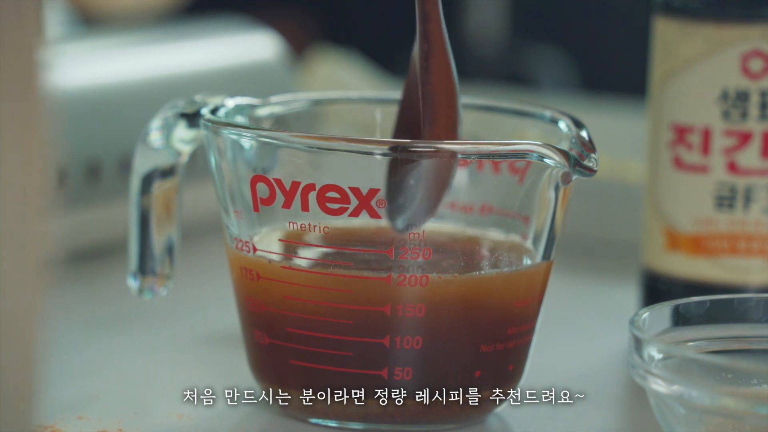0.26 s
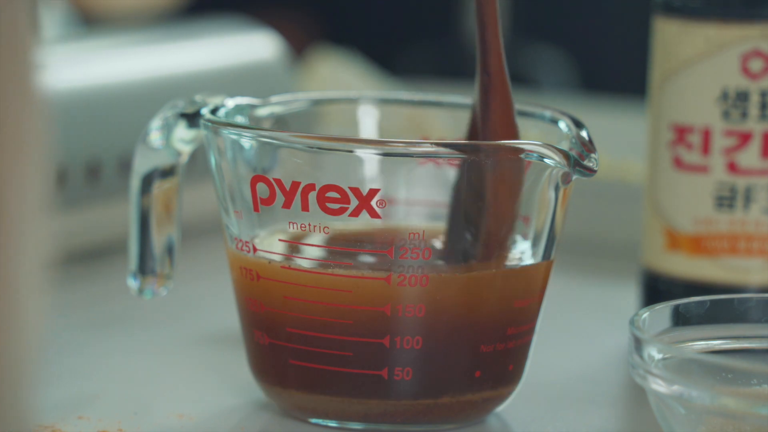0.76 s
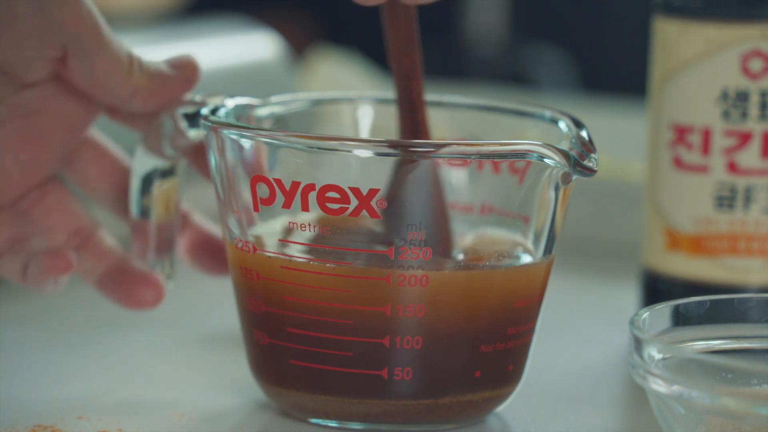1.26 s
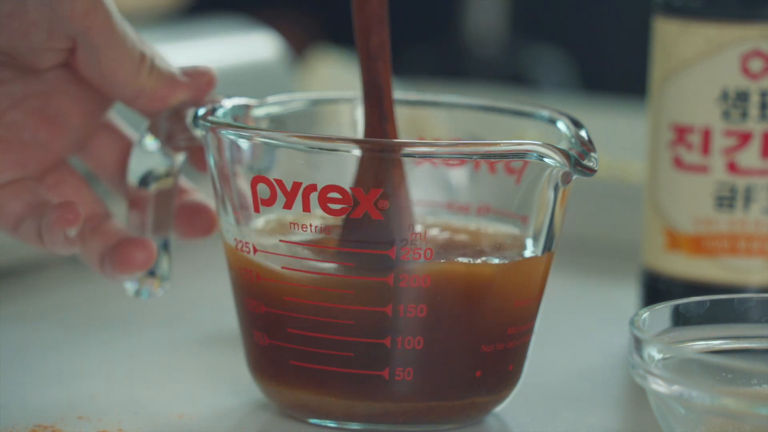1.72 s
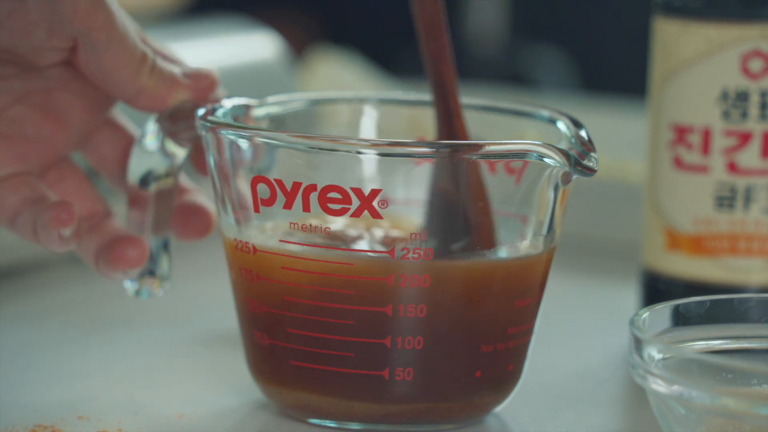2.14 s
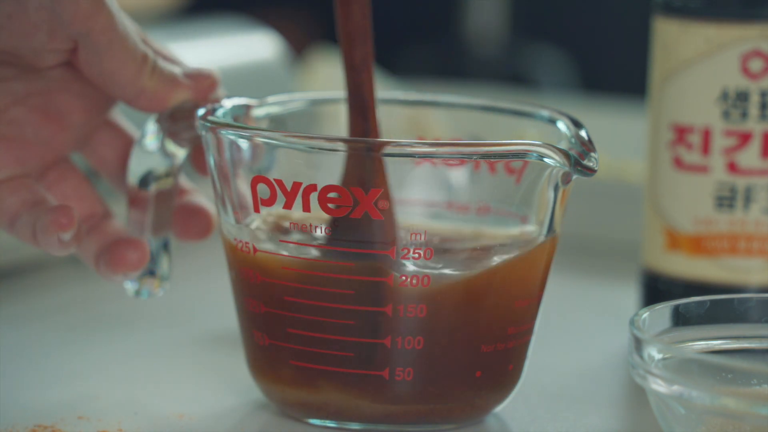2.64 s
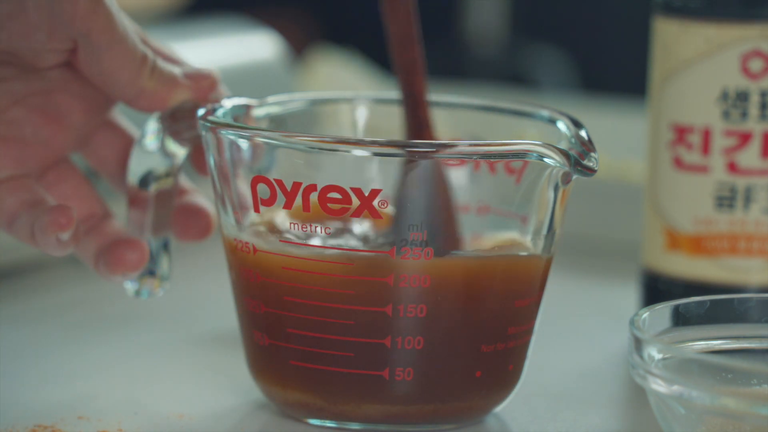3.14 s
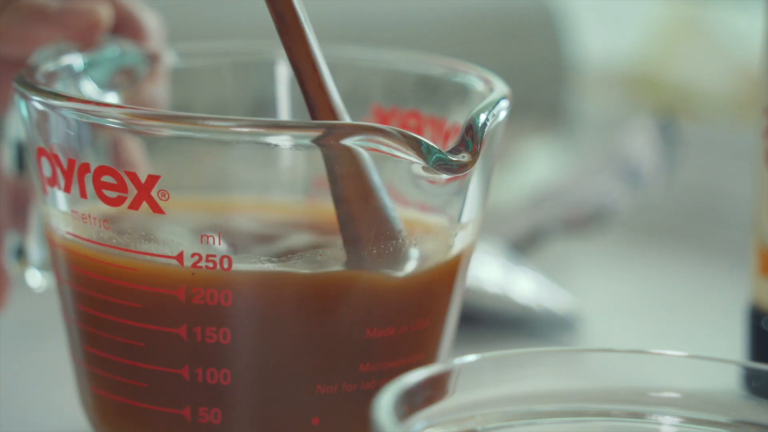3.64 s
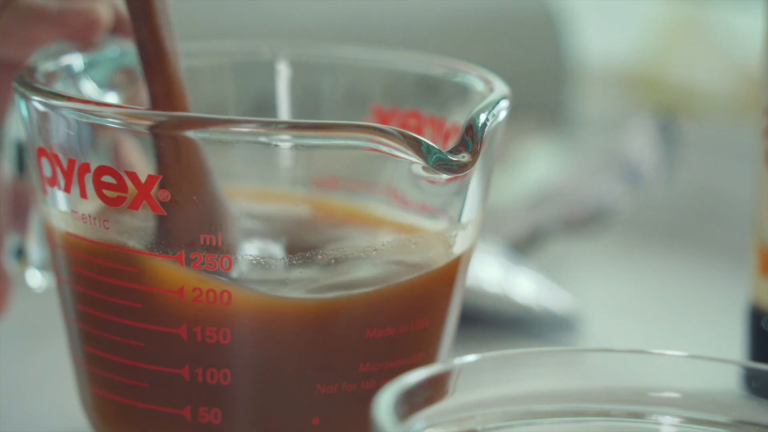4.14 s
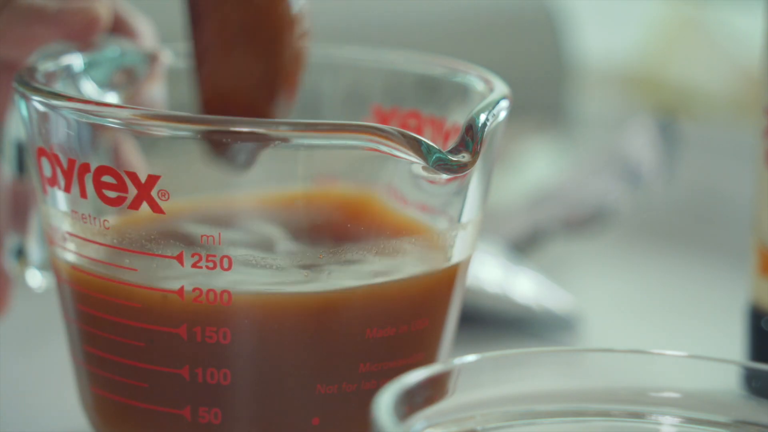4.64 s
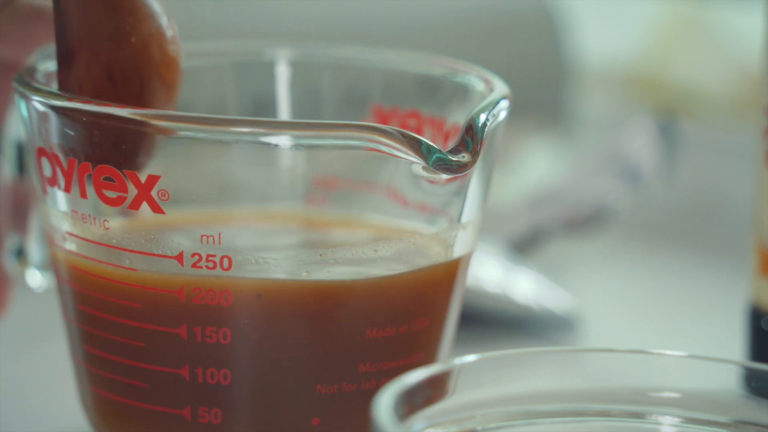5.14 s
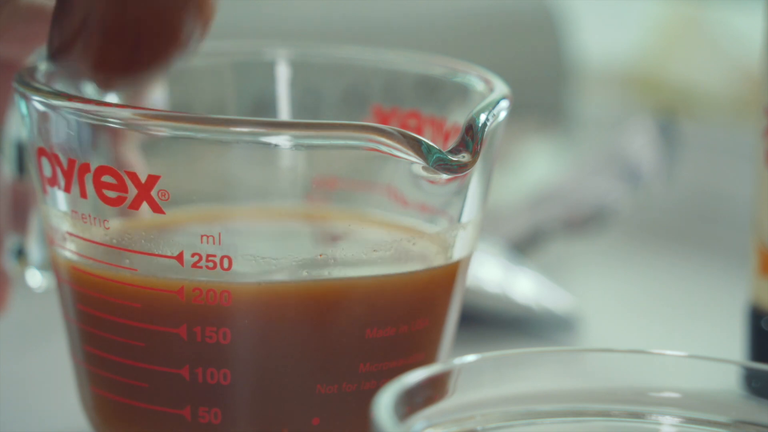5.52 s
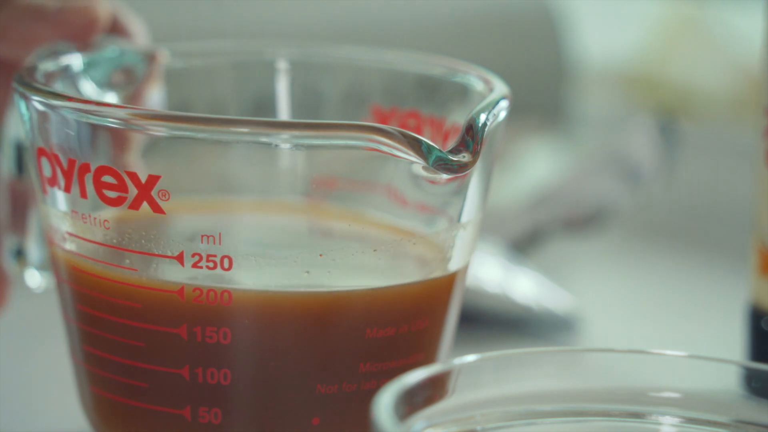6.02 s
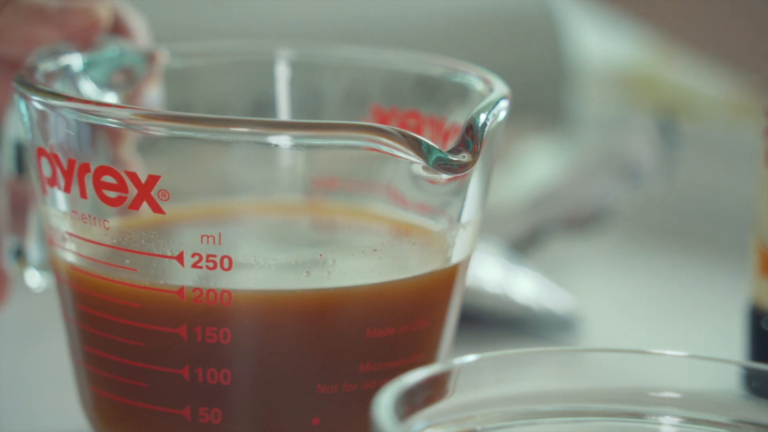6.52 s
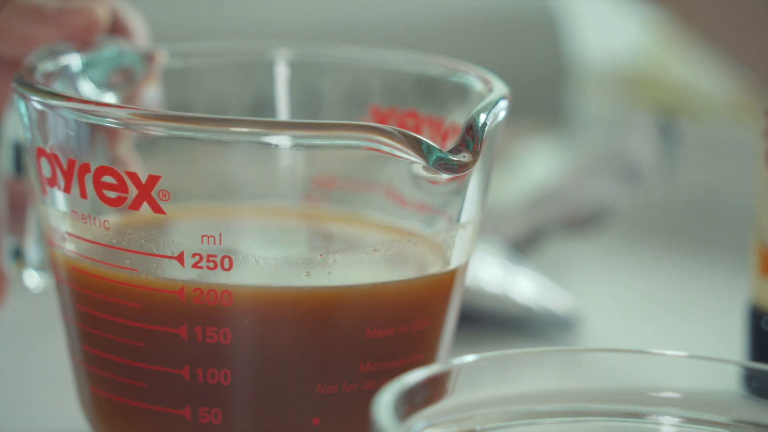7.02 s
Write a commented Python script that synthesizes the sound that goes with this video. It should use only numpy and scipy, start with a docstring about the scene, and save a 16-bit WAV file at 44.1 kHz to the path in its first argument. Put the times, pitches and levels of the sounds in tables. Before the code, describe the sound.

Quiet kitchen stirring: dull wooden nudges on a filled glass cup, faint wet ticks, two rim taps, then a knock and loud dish clatter.

```python
"""A wooden spoon stirs thin sauce in a thick glass measuring cup, nearest the microphone on a kitchen counter.
Each nudge and the last tap at the rim ring the glass modes; small ticks and lapping crackles are shaped noise.
At the start the counter is bumped: damped modes and a thud, a bright click, then a short brushing hiss.
At the end the spoon goes on a dish: a dull knock, sliding noise, a sharp clatter as the handle drops.
Still kitchen air lies behind as coloured noise; a small hard room answers with a decaying noise tail."""
import sys
import numpy as np
from scipy import signal
from scipy.fft import rfft, irfft
from scipy.io import wavfile

SR = 44100
rng = np.random.default_rng(int(sys.argv[2]) if len(sys.argv) > 2 else 0)


def wav_out(sig):
    """Save sig, one row per channel (or a flat mono array), as 16-bit PCM at SR to the path in sys.argv[1]."""
    wavfile.write(sys.argv[1], SR, np.round(np.clip(np.atleast_2d(sig).T, -1, 1) * 32767).astype(np.int16))


N = 320166
TIME = np.arange(N) / SR
RING = SR // 2  # samples in one struck sound and in the room tail: half a second
TOP_HZ = 15750  # upper limit of the microphone signal

# Still kitchen air, spectral shape: (f/Hz, relative level/dB per Hz)
AIR = [(12, -29), (20, 2), (53, -4), (83, -5), (140, -10), (180, -10), (282, -16.5), (352, -15),
       (416, -19.5), (649, -18.5), (1040, -23), (2150, -31.5), (15500, -41)]
AIR_DB = -60.5  # rms level
# Decay of the room: (f/Hz, t60/s)
ROOM_T60 = [(100, 0.83), (300, 0.51), (900, 0.53), (2500, 0.4), (6000, 0.5), (10000, 0.37), (15000, 0.45)]

# Bumps on the counter, the last two under the dish: (t/s, level/dB, contact brightness f/Hz)
BUMPS = [(.1222, -31, 9000), (.309, -53, 900), (0.3686, -54, 1400), (6.424, -53, 170), (7.019, -49, 170)]
# Ringing modes of the counter: (f/Hz, t60/s, relative level/dB)
COUNTER_MODES = [(47.6, 0.49, -29), (89.3, 0.11, -7.5), (103.2, 0.82, -20.5), (122.8, 0.25, -14.5),
                 (159, 0.077, -10.5), (252, 0.12, -13), (343.3, 0.28, -18.5), (436.6, 0.27, -21),
                 (517, 0.083, -9), (583, 0.046, -6.5), (863, 0.028, -2), (939, 0.043, -4.5),
                 (1474, 0.053, -19.5)]
# Colour of the counter's thud: (f/Hz, relative level/dB)
COUNTER_THUD = [(60, -6), (250, 2.5), (600, 1), (1000, 2.5), (1500, -15), (3000, -12.5), (6000, -27),
                (11000, -22), (15000, -41)]

# Colour of the short brushing hiss: (f/Hz, relative level/dB)
BRUSH_COLOUR = [(800, 1), (2500, -3), (5000, -2), (7500, 0), (10000, -5.5), (15000, -8)]
BRUSH_AT_S, BRUSH_DB = 0.366, -63.5  # start of the hold, level
BRUSH_RISE_S, BRUSH_HOLD_S, BRUSH_FALL_S = 0.16, 0.045, 0.24  # slopes span 60 dB
# Slips of the spoon on the dish: (t/s at the peak, level/dB, release through 60 dB/s)
SLIPS = [(6.46, -61, 0.74), (6.78, -74.5, .2), (6.915, -68, .3)]
SLIP_RISE_S = 0.39  # attack of every slip, through 60 dB
# Colour of the sliding noise: (f/Hz, relative level/dB)
SLIDE_COLOUR = [(600, -9), (1300, -7), (1900, -16), (2600, 1), (3500, -7), (4300, -16), (6700, -9.5),
                (14000, -21.5)]

# Spoon on the dish: (t/s, level/dB, contact brightness f/Hz, place 0 = well .. 1 = rim)
DISH_HITS = [(6.423, -24, 3040, 0.11), (6.873, -63, 3600, 0.67), (6.914, -64, 3200, 0.95),
             (7.0002, -28.5, 2320, 0.89), (7.0036, -11.5, 15300, 1), (7.0227, -24, 3830, 0.64),
             (7.0411, -27, 2560, 1), (7.0542, -33.5, 4570, 0.34), (7.063, -39, 9000, 1)]
# Ringing modes of the dish: (f/Hz, t60/s, relative level/dB struck in the well, the same at the rim)
DISH_MODES = [(902, 0.056, -24.5, -22.5), (1171, 0.11, -20, -12.5), (1266, 0.04, -5, -24),
              (1308.3, 0.18, -10.5, -15.5), (1333, 0.063, -2.5, -16), (1510, 0.054, -15, -21),
              (1760, 0.021, -19, -28), (2050, 0.074, -8.5, -39), (2098, 0.029, 3, -25),
              (2308, 0.02, -11.5, 2), (2483, 0.013, -28, 6.5), (2580, .35, -41, -39),
              (2710, 0.015, -8, -21), (3140, 0.034, -8.5, -6), (3300, 0.029, -6, 1.5),
              (3492, 0.025, -9.5, 2), (3750, 0.025, -33, -15), (4500, 0.027, -12.5, -10),
              (4930, 0.22, -31, -21), (5250, 0.018, -28, 4.5), (6040, 0.021, -41, -18),
              (6430, 0.033, -35, -8), (6600, 0.39, -26, -20.5), (6620, .022, -30, 0),
              (7650, 0.015, -39, -13), (7800, 0.01, -36, 0.5), (8450, 0.013, -32, 5),
              (9300, 0.018, -38, -18), (10120, 0.02, -34, -7), (11900, 0.022, -40, -35)]
# Colour of the crack of wood on the dish: (f/Hz, relative level/dB)
DISH_CRACK = [(100, -30), (280, -2.5), (500, -5), (800, -4), (1600, 3.5), (2600, 9), (3500, 8.5),
              (4200, -4.5), (6500, 4), (9500, 0), (15000, -15.5)]

# Small ticks: the first is the bright click of a small knock on the counter, the others come
# from the wet spoon: (t/s, level/dB, tilt/dB per octave, ring of the glass over the tick/dB)
TICKS = [(0.3678, -60, -1, -9), (1.2207, -71, 5, -20), (1.3304, -73, 11, -20), (2.2741, -55.5, -0.5, -10),
         (2.8501, -64, -2, -13), (2.927, -67, -4, -7), (3.089, -65.5, -1.5, -6), (3.1163, -67, 0.5, -15),
         (3.1641, -59.5, 2.5, -22), (3.418, -73, 3, -1), (3.7077, -67.5, 7, -1)]
# Strokes that push a wave of sauce round the spoon: (t/s at the crest, level/dB)
LAPS = [(1.45, -73), (2.25, -82), (2.76, -69.5), (2.92, -67.5), (3.17, -63), (3.44, -77)]
LAP_RISE_S, LAP_FALL_S = 0.46, 0.33  # every wave gathers and settles alike, through 60 dB
# Colour of the hollow of the cup, shared by the ticks and the laps: (f/Hz, relative level/dB)
HOLLOW = [(300, 4), (1000, 3.5), (1700, 5.5), (2200, 0), (2600, 11.5), (3200, -41), (3800, 0), (4300, -1.5),
          (5000, -17), (6500, -2.5), (8000, 1), (9600, -7.5), (11000, -24), (14000, -14)]

# Spoon on the cup: (t/s, level/dB, contact brightness f/Hz,
# place 0 = wall under the sauce .. 1 = rim, thud relative level/dB)
CUP_HITS = [(1.177, -54.5, 2060, 0.18, 10), (1.693, -49, 2680, 0.16, -2.5), (2.135, -52, 1890, 0.16, 4.5),
            (2.181, -55, 2200, 0.26, 6), (2.668, -57.5, 1750, 0.31, 2), (3.040, -56.5, 1600, 0.04, 9.5),
            (3.585, -56, 2960, 0.35, 1), (4.933, -45.5, 2200, 0.55, 1.5), (5.382, -41, 12600, 0.77, -1.5)]
# Ringing modes of the filled cup: (f/Hz, t60/s, relative level/dB struck on the wall, the same at the rim)
CUP_MODES = [(213, 0.088, -24, -13), (567, 0.1, -12, -14), (940, 0.019, -9, -29), (1250, 0.069, -10, -9),
             (1473, 0.19, -0.5, 1), (2130, 0.07, 6, -39), (2520, 0.039, -5, -31), (3290, 0.019, -20, 2),
             (3660, 0.071, -17, -2), (4270, 0.076, -18, -7), (7510, .05, -30, -28)]
# Colour of the wood and liquid under each contact: (f/Hz, relative level/dB)
CUP_THUD = [(90, -13), (200, 3.5), (550, -2), (1050, 2.5), (1900, -16.5), (2500, -4.5), (3100, -11.5),
            (5500, -18), (9000, -13), (11000, -21), (14000, -10)]


def undb(db):
    """Decibels to gain."""
    return 10 ** (np.asarray(db) / 20)


def on_log_axis(hz, points):
    """Read (f/Hz, value) points on a log-frequency axis."""
    f, value = np.transpose(sorted(map(tuple, points)))
    return np.interp(np.log(np.maximum(hz, 1)), np.log(f), value)


def noise(colour, size):
    """Noise of rms 1, its spectrum shaped by (f/Hz, level/dB) points."""
    spectrum = rfft(rng.standard_normal(size))
    gain = undb(on_log_axis(np.fft.rfftfreq(size, 1 / SR), colour))
    shaped = irfft(spectrum * gain, size)
    return shaped / shaped.std()


def swell(s, db, rise_s, fall_s, hold_s=0):
    """Gain over time: an attack that peaks at s, a hold and a release; both slopes span 60 dB."""
    early = np.maximum(s - TIME, 0)
    late = np.maximum(TIME - s - hold_s, 0)
    return undb(db) * np.exp(-np.log(1000) * (early / rise_s + late / fall_s))


def fade(t60):
    """An exponential decay through 60 dB in t60 seconds."""
    return np.exp(-np.log(1000) * TIME[:RING] / t60)


def add(track, s, sound, db):
    """Lay a sound into a track; db is its rms over the first hundredth of a second."""
    start = int(s * SR)
    part = sound[:N - start] * undb(db) / sound[:SR // 100].std()
    track[start:start + len(part)] += part


def struck_at(modes, place):
    """The place of a blow, 0 to 1, decides how strongly each mode speaks."""
    hz, t60, inner_db, rim_db = np.transpose(modes)
    return zip(hz, t60, inner_db + place * (rim_db - inner_db))


def strike(modes, colour, crack_db, crack_t60, bright_hz, lowest_hz, grit_db=-34, order=3):
    """One blow: ringing modes and a short crack; a softer contact pushes longer and loses the treble."""
    ring = np.zeros(RING)
    for k, (hz, t60, db) in enumerate(modes):
        sign = (-1) ** k  # neighbouring modes start in opposite directions
        ring += sign * undb(db) * fade(t60) * np.sin(2 * np.pi * hz * TIME[:RING])
    body = ring + undb(crack_db) * fade(crack_t60) * noise(colour, RING)
    contact = signal.butter(order, bright_hz, fs=SR, output="sos")
    # the grain of the wood lets a little treble through even a soft contact
    blow = signal.sosfilt(contact, body) + undb(grit_db) * body
    # a small object radiates no deep bass
    return signal.sosfilt(signal.butter(2, lowest_hz, "high", fs=SR, output="sos"), blow)


def kitchen_air():
    """Steady noise with the spectrum of the still kitchen: low rumble and faint hiss."""
    return noise(AIR, N) * undb(AIR_DB)


def room(x, wet_db, build_s, count=10):
    """Reflections as a noise tail that builds up quickly and dies band by band."""
    hz = np.fft.rfftfreq(RING, 1 / SR)
    centres = np.geomspace(100, TOP_HZ, count)
    white = rfft(rng.standard_normal(RING))
    tail = np.zeros(RING)
    for centre, share in zip(centres, np.eye(count)):
        # each band overlaps its neighbours, and together they add up to 1
        band = irfft(white * on_log_axis(hz, zip(centres, share)), RING)
        tail += band * fade(on_log_axis(centre, ROOM_T60))
    tail *= 1 - np.exp(-(TIME[:RING] / build_s) ** 2)
    return undb(wet_db) * signal.fftconvolve(x, tail / np.linalg.norm(tail))[:N]


def counter():
    """The worktop's modes boom when it is bumped, and faintly under the dish."""
    out = np.zeros(N)
    for s, db, bright_hz in BUMPS:
        blow = strike(COUNTER_MODES, COUNTER_THUD, crack_db=-4, crack_t60=0.025,
                      bright_hz=bright_hz, lowest_hz=39.3, grit_db=-42)
        add(out, s, blow, db)
    return out


def rubbing():
    """Friction as swelling noise: a brief brush after the bump, and the wet spoon sliding on the dish."""
    brush = swell(BRUSH_AT_S, BRUSH_DB, BRUSH_RISE_S, BRUSH_FALL_S, BRUSH_HOLD_S)
    slips = sum(swell(s, db, SLIP_RISE_S, fall_s) for s, db, fall_s in SLIPS)
    return noise(BRUSH_COLOUR, N) * brush + noise(SLIDE_COLOUR, N) * slips


def dish(well_crack_db=0, rim_crack_db=5):
    """The spoon's bowl lands in the well; its handle drops on the rim with a harder crack and bounces."""
    out = np.zeros(N)
    for s, db, bright_hz, place in DISH_HITS:
        crack_db = well_crack_db + place * (rim_crack_db - well_crack_db)
        blow = strike(struck_at(DISH_MODES, place), DISH_CRACK, crack_db, crack_t60=0.016,
                      bright_hz=bright_hz, lowest_hz=380, grit_db=-30, order=5)
        add(out, s, blow, db)
    return out


def hollow_colour(tilt_db):
    """The colour of the cup's hollow, tilted by tilt_db per octave."""
    return [(hz, db + tilt_db * np.log2(hz)) for hz, db in HOLLOW]


def small_ticks():
    """Short noise clicks over a light ring: first a small knock on the counter, then films off the wet spoon."""
    out = np.zeros(N)
    # so light a touch wakes only the upper modes of the glass
    graze = strike(struck_at(CUP_MODES, 0.62), CUP_THUD, crack_db=-12, crack_t60=0.02,
                   bright_hz=11000, lowest_hz=5000)
    for s, db, tilt_db, glass_db in TICKS:
        add(out, s, noise(hollow_colour(tilt_db), RING) * fade(0.017), db)
        add(out, s, graze, db + glass_db)
    return out


def sauce_laps(grains_per_s=220, spread_db=3, tilt_db=-3.5):
    """Tiny crackles, random in time and size, lap round the spoon in waves as it turns."""
    happens = rng.random(N) < grains_per_s / SR
    size_db = spread_db * np.minimum(rng.exponential(size=N), np.pi)
    crackle = signal.fftconvolve(happens * undb(size_db), fade(0.03))[:N]
    lap = crackle * noise(hollow_colour(tilt_db), N)
    waves = sum(swell(s, db, LAP_RISE_S, LAP_FALL_S) for s, db in LAPS)
    return lap / lap.std() * waves


def cup():
    """The spoon nudges the glass wall under the sauce, then taps the bare rim; the place picks the modes."""
    out = np.zeros(N)
    for s, db, bright_hz, place, thud_db in CUP_HITS:
        blow = strike(struck_at(CUP_MODES, place), CUP_THUD, thud_db, crack_t60=0.057,
                      bright_hz=bright_hz, lowest_hz=110, grit_db=-45, order=4)
        add(out, s, blow, db)
    return out


def scene():
    """Blows, ticks and laps sound in one room; rubbing and kitchen air are heard without its tail."""
    around = counter() + dish() + small_ticks() + sauce_laps()
    close = cup()
    # the cup stands nearest the microphone, so less of it comes back from the walls
    walls = room(around + undb(-2.5) * close, wet_db=-4.5, build_s=0.0039)
    return (close + around + walls + rubbing() + kitchen_air())[None]


def record(dry):
    """Peaks beyond full scale are clipped, then a steep low-pass cuts the top."""
    low_pass = signal.ellip(10, 0.1, 80, TOP_HZ, fs=SR, output="sos")
    return signal.sosfilt(low_pass, np.clip(dry, -1, 1))


dry = scene()
out = record(dry)
wav_out(out)
```